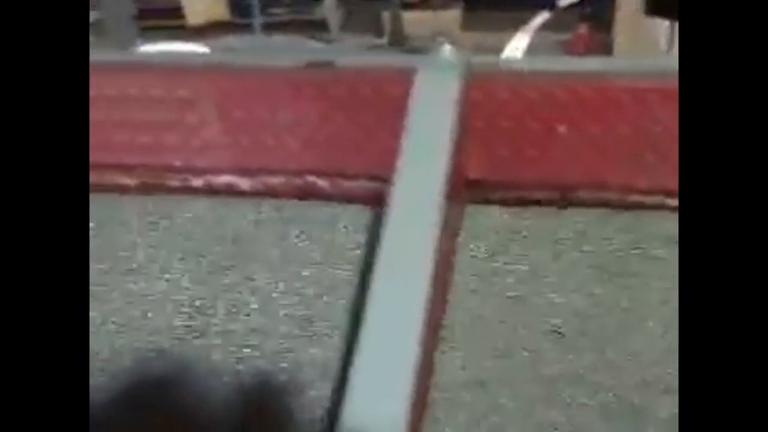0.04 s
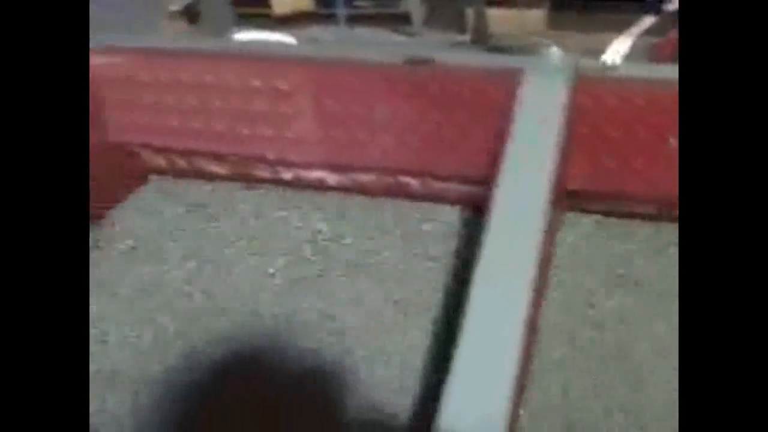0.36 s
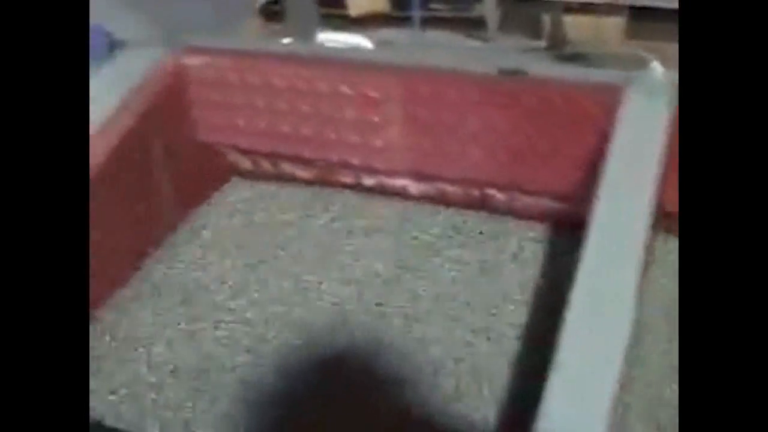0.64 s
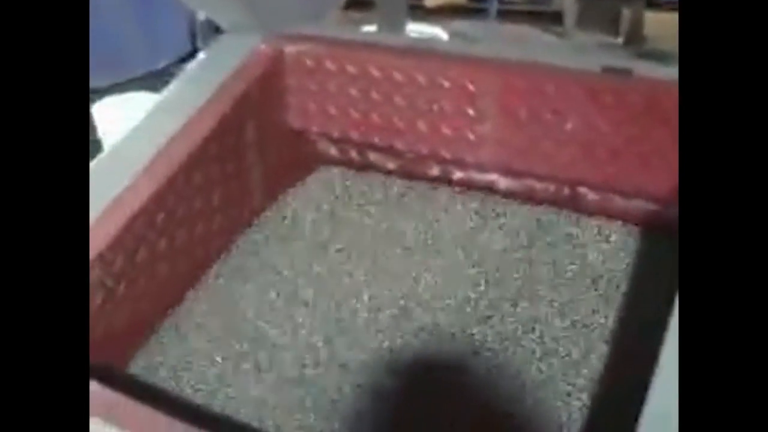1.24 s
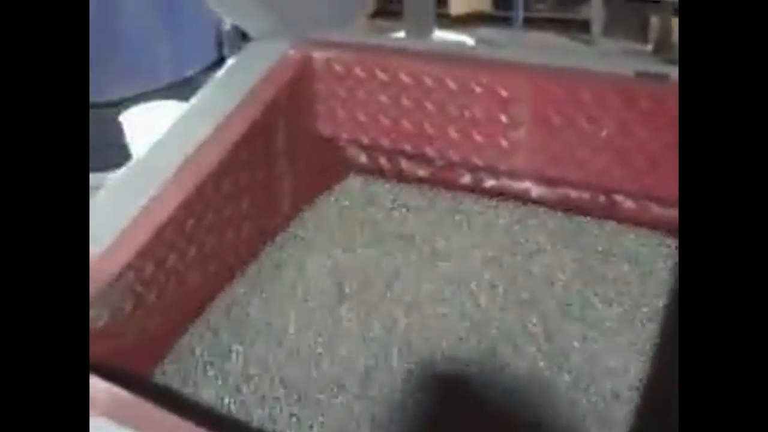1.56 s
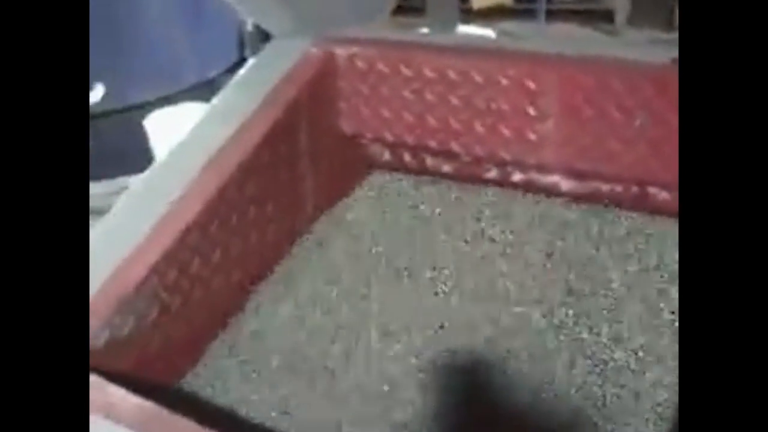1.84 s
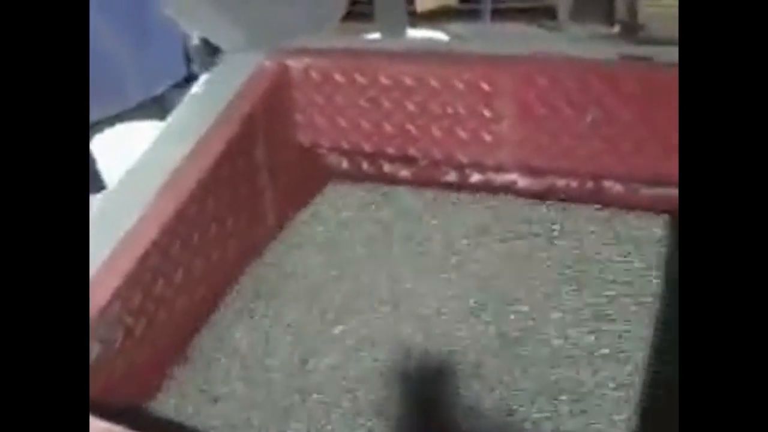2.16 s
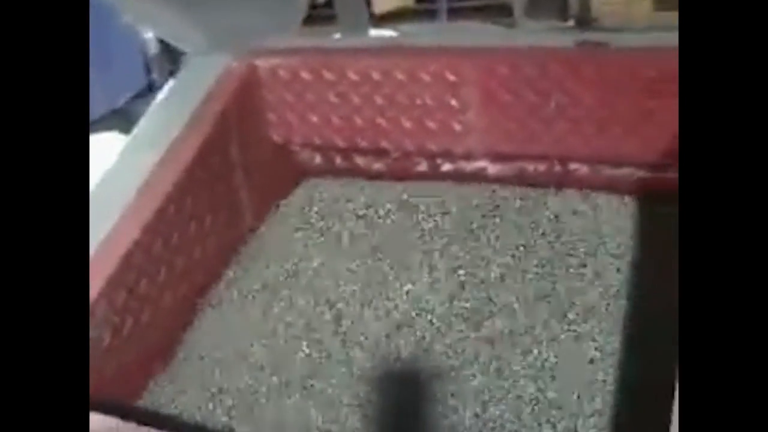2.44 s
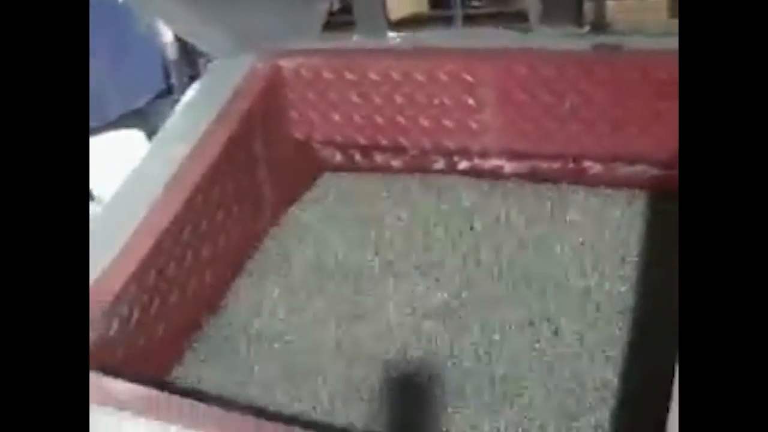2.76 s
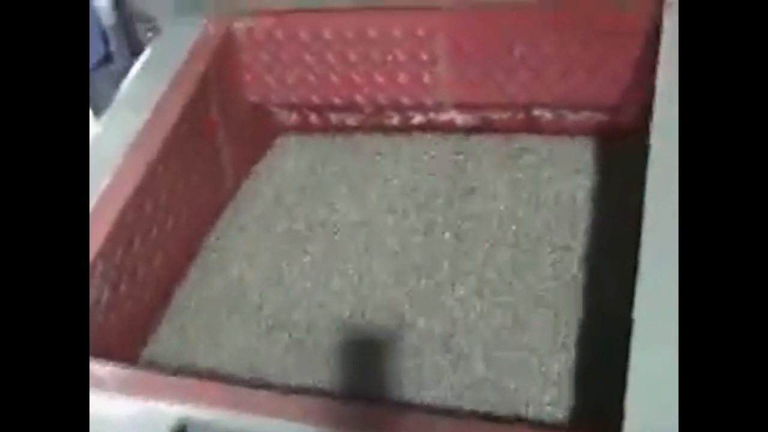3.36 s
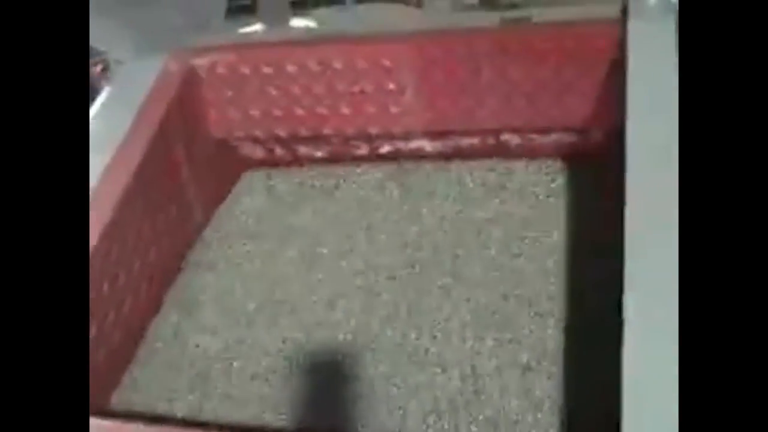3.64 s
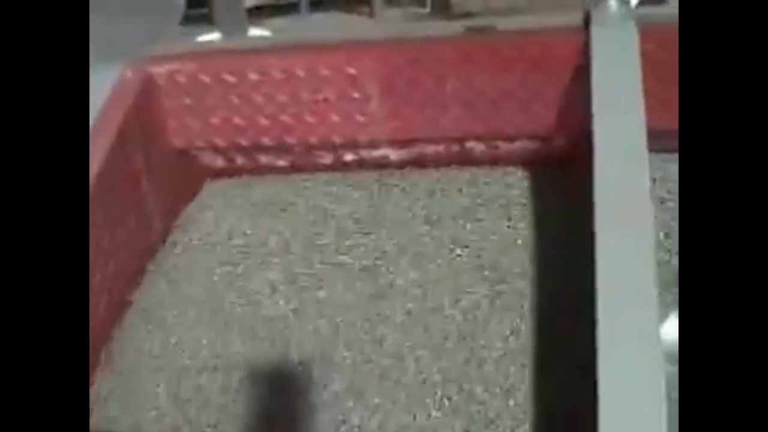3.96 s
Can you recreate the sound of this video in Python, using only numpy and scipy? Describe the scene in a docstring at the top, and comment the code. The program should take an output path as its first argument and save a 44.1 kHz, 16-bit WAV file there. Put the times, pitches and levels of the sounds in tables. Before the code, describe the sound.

Low throbbing drone of a vibrating finishing tub, with dense metallic rattling and thin hiss.

```python
"""Vibratory finishing tub in a workshop.

Heard from just above the rim, an off-centre weight shakes the tub about thirty times a second.
The load lands differently on every other turn, and heavy landings make the drone throb.
Thousands of small metal pieces clatter in time and the walls ring.
A ringing treble chatter and a thin, flickering band of high hiss are also heard."""
import sys
import numpy as np
from scipy import signal
from scipy.fft import rfft, irfft
from scipy.io import wavfile
from scipy.ndimage import uniform_filter1d

SR = 44100
rng = np.random.default_rng(int(sys.argv[2]) if len(sys.argv) > 2 else 0)


def bounce(signal):
    """Save signal as a 16-bit WAV file at the path given by the first command-line argument."""
    frames = np.transpose(np.atleast_2d(signal))
    limited = np.clip(frames, -1, 1)
    pcm = np.round(limited * 32767).astype(np.int16)
    wavfile.write(sys.argv[1], SR, pcm)


N = 176400
LANDING_TURNS, KNOCK_TURNS = 0.21, 1.367  # where the load lands and knocks back


def undb(db):
    """dB to amplitude."""
    return 10 ** (np.asarray(db) / 20)


def level(x, db):
    """Set the rms level."""
    return x * undb(db) / np.sqrt(np.mean(x ** 2))


def curve(t, points):
    """Straight lines through (time_s, value) points."""
    return np.interp(t, *np.array(points).T)


def walk(rate_hz):
    """Random steps, smoothed twice; rms 1."""
    hold = int(SR / rate_hz)
    steps = np.repeat(rng.standard_normal(512)[:N // hold + 1], hold)
    return level(uniform_filter1d(uniform_filter1d(steps, hold), hold)[:N], 0)


def colour(x, points):
    """Minimum-phase filter through (freq_hz, gain_db) points."""
    hz, db = np.array(points, float).T
    f = np.maximum(np.fft.rfftfreq(N, 1 / SR), 1)
    gain = undb(np.interp(np.log(f), np.log(np.sort(hz)), db))
    cepstrum = irfft(np.log(gain), N)
    cepstrum[1:N // 2] *= 2
    cepstrum[N // 2 + 1:] = 0
    return irfft(rfft(x) * np.exp(rfft(cepstrum)), N)


def ring(x, hz, width_hz):
    """One resonance, gain 1 at its centre."""
    f = np.maximum(np.fft.rfftfreq(N, 1 / SR), 1)
    return irfft(rfft(x) / (1 + 1j * (f * f - hz * hz) / (f * width_hz)), N)


def band(x, hz, width_hz):
    """Two equal resonances in series."""
    return ring(ring(x, hz, width_hz), hz, width_hz)


def pings(rows, t60_s, attack_s=0.0015):
    """Decaying sines from (start_sample, pitch_hz, amplitude) rows."""
    t = np.arange(SR // 12) / SR
    fade = (1 - np.exp(-t / attack_s)) * np.exp(-np.log(1000) * t / t60_s)
    out = np.zeros(N + len(t))
    for start, hz, size in rows:
        out[start:start + len(t)] += size * fade * np.sin(2 * np.pi * hz * t)
    return out[:N]


def tones(angle, orders, waver_db, lag_rad):
    """Wavering harmonics of a rotation; the tub answers with a lag."""
    return sum(np.sqrt(2) * undb(db + waver_db * walk(6.1)) * np.cos(round(order) * angle - lag_rad)
               for order, db in orders)


def shaking(angle, churn_db=0.84):
    """Force on the pieces: peaks as they land, uneven on alternate turns, with a random churn."""
    landing = angle - 2 * np.pi * LANDING_TURNS
    throw = 0.13 * np.cos(landing) + 0.027 * np.cos(2 * landing) + 0.057 * np.cos(landing / 2)
    return np.exp(throw) * undb(churn_db * walk(22.02))


def impacts(shake, hits_per_s=5500, spread_db=3.5):
    """Random impulses of capped strength, scaled by the shaking."""
    happens = rng.random(N) < hits_per_s / SR
    sign = np.sign(rng.standard_normal(N))
    strength = undb(spread_db * np.minimum(rng.standard_normal(N), 2))
    return happens * sign * strength * shake


def hiss(shake, flicker_db=1.5, flicks_per_s=5.5, flick_s=0.035, flick_dip=0.71):
    """A thin band of high hiss flickers and now and then dips briefly to a lower band."""
    # hiss spectrum: freq_hz, gain_db
    spectrum = [(6200, -47.5), (6330, -8), (6400, 2), (7270, 3.5), (7340, -28), (7600, -44.5)]
    high = level(colour(impacts(np.sqrt(shake)), spectrum), -45) * undb(flicker_db * walk(43))
    low = level(band(impacts(shake), hz=5390, width_hz=580), -48)
    hold = int(flick_s * SR)
    drops = 1. * (rng.random(512) < flicks_per_s * flick_s)
    flick = uniform_filter1d(np.repeat(drops, hold)[:N], hold // 2)
    return high * (1 - flick_dip * flick) + low * flick


def walls(shake, t, panel_hz=740.3, wander_hz=4, waver_db=3.3):
    """Pieces keep the walls ringing; one panel sings unsteadily, most in the first two seconds."""
    # wall modes: pitch_hz, width_hz, level_db
    modes = [(347.8, 6.3, -47), (506, 17, -50.5), (847.3, 9, -45.5), (1079, 17, -50.5), (1242, 14, -48),
             (1657, 18, -53.5), (2265, 41, -49), (2560, 7.7, -54.5)]
    # ring of the loudest panel: time_s, level_db
    panel_levels = [(0, -46), (.11, -32), (.3, -42), (.55, -46), (.7, -37.5), (1.05, -40.5), (1.2, -37.5),
                    (1.5, -35.5), (1.62, -43), (1.73, -36), (1.85, -46), (2.02, -41), (2.2, -54.5),
                    (3.2, -45.5), (4, -49)]
    hits = impacts(shake)
    phase = 2 * np.pi * np.cumsum(panel_hz + wander_hz * walk(40)) / SR
    panel = level(np.sin(phase) * undb(waver_db * walk(25)), 0)
    ringing = sum(level(ring(hits, hz, width_hz), db) for hz, width_hz, db in modes)
    return panel * undb(curve(t, panel_levels)) + ringing


def hollows(shake, t, waver_db=1.2):
    """Clatter booms in the open tub; the lower resonance yields to the upper as the listener moves."""
    # hollow resonances at the listener: time_s, lower_db, upper_db
    levels = [(0, -39.5, -54.5), (.8, -37, -54.5), (1.6, -40, -56), (2.101, -39, -39), (2.8, -49, -37),
              (4, -48.5, -41.5)]
    time_s, lower_db, upper_db = np.array(levels).T
    out = 0
    for hz, width_hz, db in ((289.7, 120, lower_db), (563, 330, upper_db)):
        boom = band(impacts(shake), hz, width_hz) * undb(waver_db * walk(20))
        out = out + level(boom, 0) * undb(np.interp(t, time_s, db))
    return out


def slaps(angle, width_turns=0.082):
    """Every other turn the load slaps the tub, at the stroke and again as it knocks back."""
    turns = angle / (2 * np.pi)
    gate = sum(np.exp(-(((turns - at + 1) % 2 - 1) / width_turns) ** 2) for at in (1, KNOCK_TURNS))
    burst = rng.standard_normal(N) * gate
    return level(band(burst, hz=285, width_hz=287), -40.5)


def rumble(angle, pulse_depth=0.35):
    """The shifting mass of the load thuds dully on each stroke."""
    # rumble spectrum: freq_hz, gain_db
    spectrum = [(15, -23), (40, -20), (70, -6), (94, 1), (115, -0.5), (150, -4), (200, -9), (300, -15.5),
                (500, -63)]
    pulse = np.exp(pulse_depth * np.cos(angle - 2 * np.pi * LANDING_TURNS))
    return level(colour(rng.standard_normal(N) * pulse, spectrum), -33)


def thuds(t, pitch_hz=94.5, rise_s=0.009, t60_s=0.15, gain_db=-15.5):
    """Several times a second the load lands heavily and the tub booms."""
    # heavy landings: peak_s, gain_db
    landings = [(.330, 1), (0.529, -2), (0.596, -12), (.725, -5), (0.792, -8), (0.989, -4), (1.187, -12),
                (1.382, 0), (1.579, -6), (1.645, -9), (1.777, -0.5), (1.843, -1), (2.041, -10), (2.107, -8),
                (2.237, -5), (2.303, -13), (2.434, -1), (2.501, -5), (2.696, 3.5), (2.895, -1),
                (3.092, -3.5), (3.355, -4.5), (3.551, 2), (3.748, -1), (3.946, -3)]
    out = 0
    for peak_s, db in landings:
        age_s = t - peak_s
        rise = (np.minimum(age_s, 0) / rise_s) ** 2
        decay = np.log(1000) * np.maximum(age_s, 0) / t60_s
        out = out + undb(gain_db + db) * np.exp(-rise - decay) * np.cos(2 * np.pi * pitch_hz * age_s)
    return out


def drone(angle, gain_db=1.6):
    """The weight drives the tub once a turn; the load knocks back every other turn, adding tones."""
    # tub drone: shaft_order, gain_db
    stroke_orders = [(1, -15.5), (2, -25), (3, -20), (5, -33.5), (7, -44.5)]
    # load rocking over two turns: half_shaft_order, gain_db
    rock_orders = [(3, -37), (5, -30), (7, -35.5), (8, -36.5), (9, -38.5), (13, -45.5), (15, -52),
                   (17, -59)]
    rock_angle = (angle - 2 * np.pi * KNOCK_TURNS) / 2
    stroke = tones(angle, stroke_orders, waver_db=0.54, lag_rad=0.36)
    rocking = tones(rock_angle, rock_orders, waver_db=0.6, lag_rad=1.17)
    return undb(gain_db) * (stroke + rocking)


def chatter(shake, pings_per_s=560, low_hz=1549, high_hz=4005, spread_db=1.2, clink_s=2.157):
    """Ringing treble chatter of short pings at random pitches, with one brighter clink."""
    # spectrum of the chatter: freq_hz, gain_db
    spectrum = [(1500, -4.5), (1750, 2.5), (1970, -1.5), (2280, -0.5), (2500, -1.5), (2750, 1),
                (3300, -0.5), (3700, -3), (4000, -2), (4200, -24.5)]
    # modes of the bright clink: pitch_hz, gain_db
    clink_modes = [(3950, 1.5), (4270, -4), (4640, -10), (4900, -8.5)]
    chance, pitch, size = rng.random(N), rng.random(N), rng.standard_normal(N)
    starts = np.flatnonzero(chance < pings_per_s / SR)
    pitch_hz = low_hz + (high_hz - low_hz) * pitch[starts]
    strength = shake[starts] * undb(spread_db * size[starts])
    many = pings(zip(starts, pitch_hz, strength), t60_s=0.105)
    clink = pings([(int(clink_s * SR), hz, undb(db - 31)) for hz, db in clink_modes], t60_s=0.089)
    return level(colour(many, spectrum), -36.5) + clink


def crunch(shake, t, knocks_per_s=380, low_hz=577.6, high_hz=1599):
    """Clumps of pieces knock together with short dull rings: the coarse grain of the rattle."""
    # crunch, fuller over the open tub: time_s, gain_db
    gains = [(0, -36), (1.5, -37), (2.2, -38), (2.7, -36.5), (3.3, -35.5), (4, -42.5)]
    chance, pitch = rng.random(N), rng.random(N)
    starts = np.flatnonzero(chance < knocks_per_s / SR)
    pitch_hz = low_hz + (high_hz - low_hz) * pitch[starts]
    knocks = pings(zip(starts, pitch_hz, shake[starts]), t60_s=0.051)
    return level(knocks, 0) * undb(curve(t, gains))


def clatter(shake, surge_hz=(327, 517, 920), surge_db=3):
    """Metal pieces collide; the lower bands surge and sink as the load turns over."""
    # clatter spectrum: freq_hz, gain_db
    spectrum = [(120, -8), (290, -4), (430, -1.5), (520, -3.5), (700, -2), (930, -4.5), (1100, -3.5),
                (1430, -4), (1750, -10), (1970, -19), (2280, -11.5), (2500, -18.5), (2750, -11.5),
                (3300, -11.5), (3700, -28), (4080, -18.5), (5200, -21), (5700, -30), (6400, -25),
                (7500, -29.5), (8200, -55)]
    hits = impacts(shake)
    surge = sum(ring(hits, hz, width_hz=0.44 * hz) * (undb(surge_db * walk(14)) - 1) for hz in surge_hz)
    return level(colour(hits + surge, spectrum), -33)


def scene(first_stroke_s=0.0217):
    """The running tub at the moving listener, mono."""
    # shaft speed: time_s, speed_hz
    shaft = [(0, 30.34), (.7, 30.37), (1.1, 30.47), (1.8, 30.45), (2.2, 30.38), (2.55, 30.375),
             (2.9, 30.485), (3.27, 30.45), (3.65, 30.38), (4, 30.39)]
    # loudness at the listener: time_s, machine_gain_db, upper_gain_db
    nearness = [(0, 0, 0.4), (.5, -1.1, 0.5), (1.2, -1, -0.5), (1.65, -1.1, -0.6), (1.9, -0.5, 1.3),
                (2.6, -0.4, -0.16), (2.9, -0.9, 0), (3.3, -1.3, 0.44), (4, -1.1, 0.1)]
    t = np.arange(N) / SR
    speed_hz = curve(t, shaft)
    angle = 2 * np.pi * (np.cumsum(speed_hz) / SR - speed_hz[0] * first_stroke_s)
    shake = shaking(angle)
    machine = drone(angle) + thuds(t) + slaps(angle) + rumble(angle)
    load = clatter(shake) + crunch(shake, t)
    treble = chatter(shake) + hiss(shake)
    time_s, machine_gain_db, upper_gain_db = np.array(nearness).T
    machine *= undb(np.interp(t, time_s, machine_gain_db))
    upper = (load + treble) * undb(np.interp(t, time_s, upper_gain_db))
    return (machine + upper + walls(shake, t) + hollows(shake, t))[None]


def record(dry):
    """Steep low-pass on the top treble."""
    cutoff_hz = 8150
    return signal.sosfilt(signal.ellip(10, .2, 80, cutoff_hz, fs=SR, output="sos"), dry)


dry = scene()
out = record(dry)
bounce(out)
```